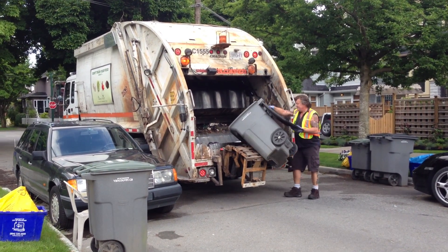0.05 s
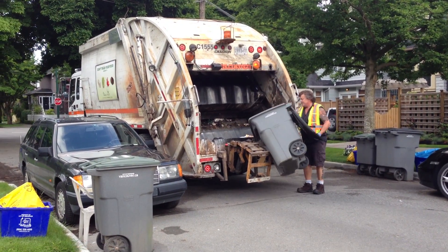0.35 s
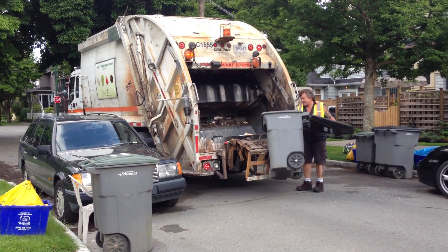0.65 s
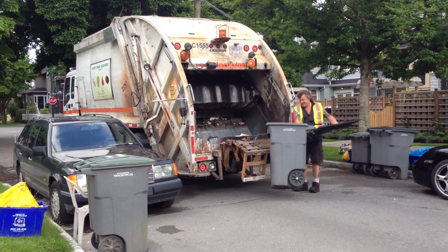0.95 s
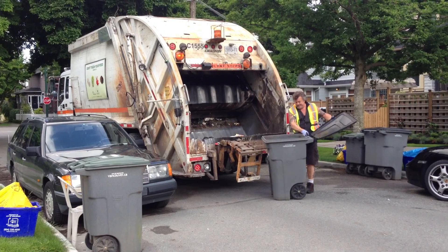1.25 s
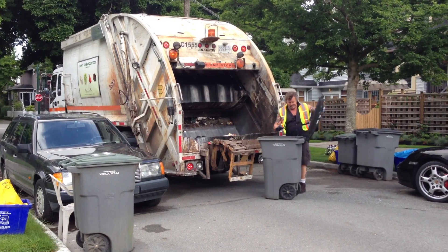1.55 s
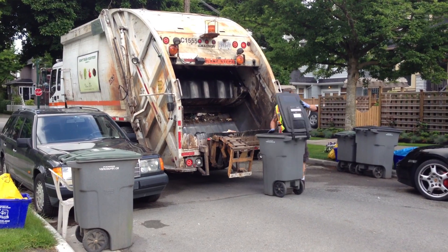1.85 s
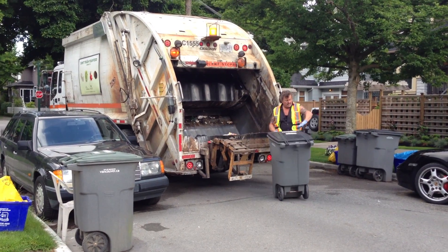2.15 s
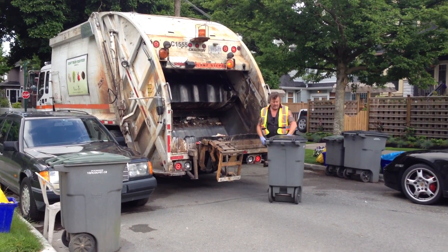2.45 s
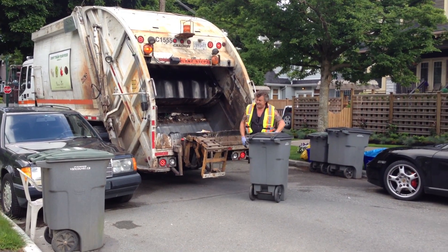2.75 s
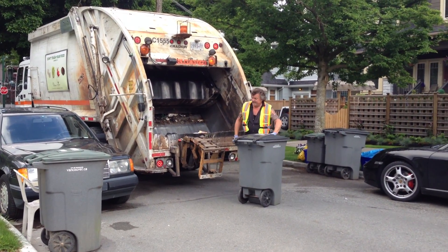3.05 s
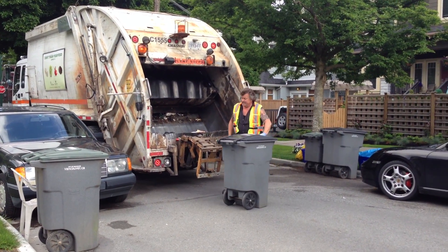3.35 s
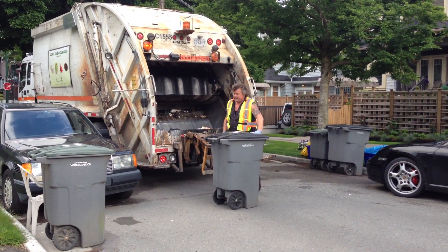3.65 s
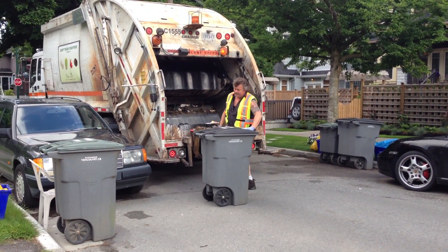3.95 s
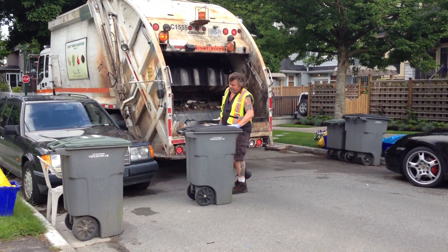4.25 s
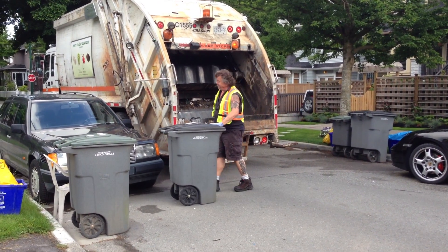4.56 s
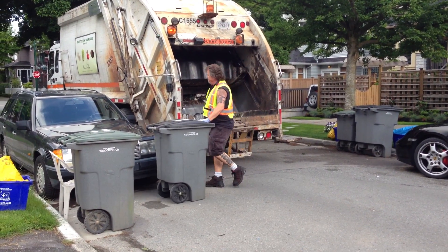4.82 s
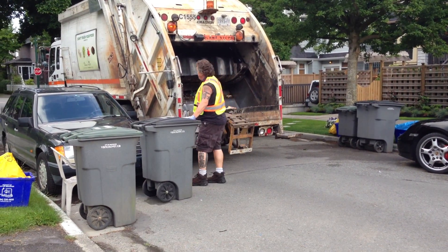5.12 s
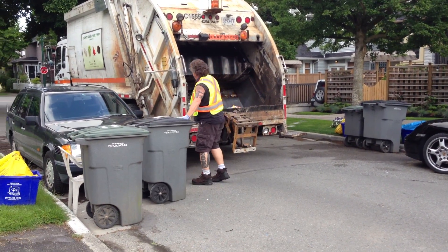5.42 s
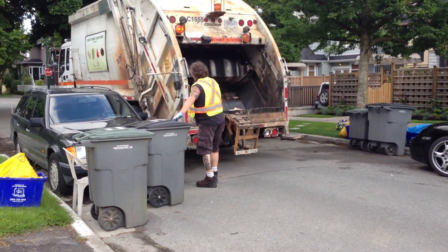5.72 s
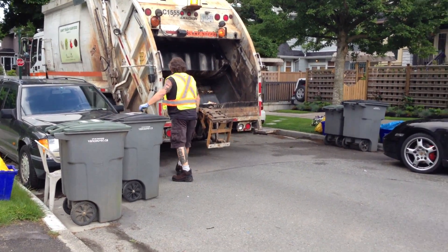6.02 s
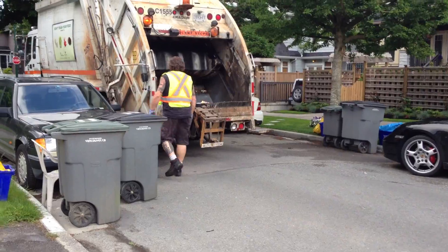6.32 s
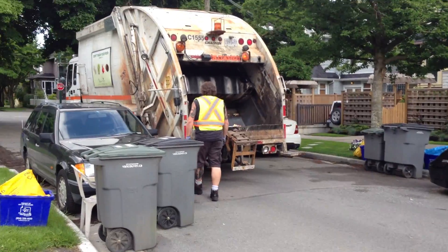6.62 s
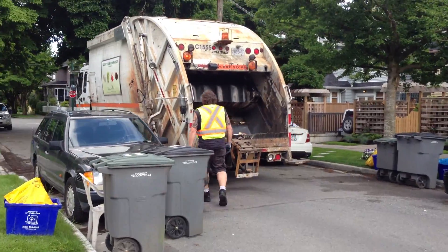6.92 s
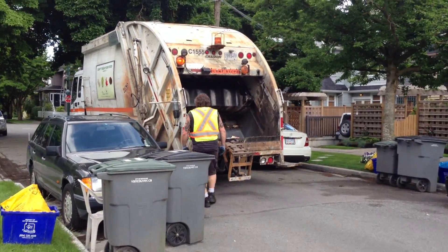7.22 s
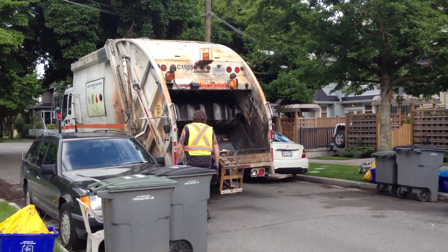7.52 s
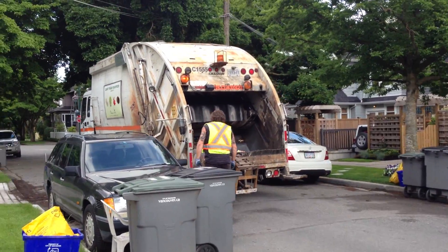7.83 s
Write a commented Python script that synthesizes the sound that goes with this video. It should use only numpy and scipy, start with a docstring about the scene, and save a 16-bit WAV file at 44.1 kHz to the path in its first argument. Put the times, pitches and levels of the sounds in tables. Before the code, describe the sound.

A garbage truck idles while a hollow plastic bin thumps down, its lid flops shut and its wheels rattle away.

```python
"""A street, a garbage truck idling. An emptied plastic wheeled bin bangs off its steel lifter and is dropped.
The lid flops shut, then the bin is pushed over rough asphalt: wheels rattle, stones snap, the base
scrapes, an axle squeaks. Every blow rings the same hollow body; truck and house fronts echo briefly."""
import sys
import numpy as np
from scipy import signal
from scipy.fft import rfft, irfft
from scipy.io import wavfile
from scipy.ndimage import uniform_filter1d

SR = 44100
rng = np.random.default_rng(int(sys.argv[2]) if len(sys.argv) > 2 else 0)


def wav_out(sig):
    """Save sig, one row per channel (or a flat mono array), as 16-bit PCM at SR to the path in sys.argv[1]."""
    wavfile.write(sys.argv[1], SR, np.round(np.clip(np.atleast_2d(sig).T, -1, 1) * 32767).astype(np.int16))


N = 347508
RING_SAMPLES = 32768

# Modes of the hollow bin. Each row: centre in Hz, width in Hz, strength in dB re the broad spectrum.
BIN_MODES = [(137, 30, 6.5), (228, 17, 4), (290, 25, 3.5), (377, 22, 1), (514, 9.2, 1.5), (577.4, 31, 7.5),
             (650, 70, 3.5), (743, 15, 8), (777, 83, 8), (867, 62, 8.5), (1196, 69, 4.5), (1334, 45, 3),
             (1807, 130, 2)]
# Bin and lid contacts. Each row: start in seconds, level in dB, boom, slap and crack shares in dB,
# base t60 in seconds, rise in seconds, panel pitch in Hz.
THUMPS = [(0.095, -27.5, -8, -3, -16, 0.15, 0.0046, 696), (0.222, -30, -9, -4, -19, 0.11, 0.0046, 727),
          (0.27, -37, -8, -4, -21, 0.4, 0.017, 703), (0.554, -11.5, -10, -10, -19, 0.064, 0.0042, 692),
          (1.163, -13, -2.5, 6, -6, 0.065, 0.0003, 524), (1.179, -16.5, -1.5, 6, -15, 0.13, 0.0018, 226),
          (1.19, -8.5, -6.5, 0.5, -14, 0.093, 0.0017, 765), (1.232, -15.5, -7, -3, -18, 0.11, .003, 742),
          (1.265, -24, 1, -3, -18, 0.12, .003, 810), (1.339, -7.5, -5.5, 1, -14, 0.1, 0.004, 232.5),
          (1.385, -17, -9, -2, -24, 0.12, 0.0019, 392), (1.414, -25.5, -7, -6, -10, 0.16, 0.0025, 140),
          (1.623, -20.5, -3.5, -6, -21, 0.087, 0.0086, 798), (1.823, -27, -1, -4, -17, 0.05, .002, 783),
          (1.85, -36, -3, -6, -17, 0.28, 0.0034, 636), (1.947, -24.5, -4, 2.5, -5.5, 0.11, 0.001, 220),
          (1.977, -31, -10, -4, -8, 0.2, .003, 838), (2.368, -24, -4, 3, -13, 0.098, 0.00077, 746),
          (2.436, -33, -1, -2, -10, 0.14, 0.0023, 800), (2.521, -23, 3.5, 7, -2, 0.081, 0.0052, 700),
          (2.537, -21, -0.5, 0.5, -9, 0.09, 0.0022, 241.5),
          (2.577, -25.5, -3, 5, -1.5, 0.081, 0.00093, 284), (2.617, -20.5, -4, -1, -9, 0.078, 0.00045, 684),
          (2.772, -35.5, -14, 1, 1, 0.17, .001, 554), (2.889, -23, -10, 1.5, -16, 0.11, 0.0011, 594),
          (3.092, -23.5, -12, -2.5, -13, 0.12, 0.0058, 623), (3.168, -22, -7, 2, -16, 0.092, 0.0017, 622),
          (3.25, -31.5, -4, -4, -15, 0.17, 0.0055, 786), (4.067, -31.5, -4, -6, -17, 0.23, .002, 790),
          (4.3, -28.5, 0.5, 2, -17, 0.21, 0.0057, 728), (4.748, -16.5, -10.5, 2.5, -12, 0.11, 0.0026, 1341),
          (5.378, -25, 0.5, -11, -13, 0.073, 0.0016, 705), (5.543, -28.5, -9, 4, -19, 0.086, 0.0018, 760)]


def undb(db):
    """Decibels to gain."""
    return 10 ** (np.asarray(db) / 20)


def curve(rows):
    """Rows of (seconds, value), interpolated per sample."""
    return np.interp(np.arange(N) / SR, *np.transpose(rows))


def decay(t, t60_s):
    """Exponential fall, 60 dB in t60_s."""
    return np.exp(-np.log(1000) * t / t60_s)


def unit_energy(x):
    """Scale to a sum of squares of 1."""
    return x / np.sqrt(np.sum(x ** 2))


def walk(rate_hz):
    """Random steps, smoothed twice; spread near 1."""
    hold = max(int(SR / rate_hz), 2)
    steps = np.repeat(rng.standard_normal(N // hold + 1), hold)
    return 1.33 * uniform_filter1d(uniform_filter1d(steps, hold), hold)[:N]


def response(shape, modes, band_hz=None):
    """Minimum-phase ring of unit energy: a broad spectrum with resonances, optionally one band of it."""
    f = np.maximum(np.fft.rfftfreq(RING_SAMPLES, 1 / SR), 1)
    shape_hz, shape_db = np.transpose(shape)
    power = undb(np.interp(np.log(f), np.log(shape_hz), shape_db)) ** 2
    power *= 1 + sum(undb(db) ** 2 / (1 + (2 * (f - hz) / width_hz) ** 2) for hz, width_hz, db in modes)
    if band_hz:
        power = power / (1 + (band_hz[0] / f) ** 8) / (1 + (f / band_hz[1]) ** 8)
    half = RING_SAMPLES // 2
    cepstrum = irfft(np.log(power + 1e-9 * power.max()) / 2)
    cepstrum[1:half] *= 2
    cepstrum[half + 1:] = 0
    return unit_energy(irfft(np.exp(rfft(cepstrum)))[:half])


def through(force, ring):
    """Convolve a force with a ring."""
    return signal.oaconvolve(force, ring)[:N]


def grains(spread_db, size=N, ripple_db=0, ripple_points=110):
    """Dense tiny contacts of uneven strength, rms 1; spectral ripple adds chance resonances."""
    x = rng.standard_normal(size)
    if ripple_db:
        position = np.linspace(0, ripple_points - 1, size // 2 + 1)
        ripple = np.interp(position, np.arange(ripple_points), rng.standard_normal(ripple_points))
        ripple *= np.minimum(np.fft.rfftfreq(size, 1 / SR) / 1500, 1)
        x = irfft(rfft(x) * undb(ripple_db * ripple), size)
    strength = np.repeat(rng.standard_normal(size // 16 + 1), 16)[:size]
    x = x * undb(spread_db * strength)
    return x / np.sqrt(np.mean(x ** 2))


def blows(rows, shape, modes, bands_hz, offsets_db, t60_scales, spread_db, ripple_db):
    """Dying bursts of chatter ring the bin by bands; a row has a share for each band after the first."""
    t = np.arange(RING_SAMPLES // 2) / SR
    forces = np.zeros((len(bands_hz), N + len(t)))
    for start_s, db, *shares_db, t60_s, rise_s in rows:
        start = int(start_s * SR)
        chatter = grains(spread_db, len(t), ripple_db, ripple_points=220) * (1 - np.exp(-t / rise_s))
        for force, share_db, scale in zip(forces, (0, *shares_db), t60_scales):
            force[start:start + len(t)] += undb(db + share_db) * decay(t, t60_s * scale) * chatter
    return sum(undb(db) * through(force[:N], response(shape, modes, band_hz))
               for force, db, band_hz in zip(forces, offsets_db, bands_hz))


def truck(crank_hz=12.15, throb_db=0.5, firing_db=1.0, flutter_db=2.3, clatter_db=-42.5, fade_db_s=0.2163):
    """A six-cylinder diesel idles: clatter, casing resonances throbbing with the crank, pump tones."""
    # Clatter spectrum. Each row: frequency in Hz, level in dB.
    shape = [(30, -35), (60, -21), (100, -2), (200, 3), (330, 2), (500, 0), (780, 3), (1100, 1), (1700, 1),
             (3200, -1), (4400, -1), (5800, -6), (8500, -6), (10200, -6), (12000, -9.5), (15000, -18)]
    # Casing resonances. Each row: centre in Hz, width in Hz, level in dB, throb depth in dB.
    casing_modes = [(736, 170, 1, 0.5), (1300, 240, -2, -2), (2005, 360, -0.5, -1), (2494, 300, 3.5, 1),
                    (4510, 910, -1.5, 1), (7320, 1250, 4, 2.5)]
    # Engine and hydraulic pump tones. Each row: frequency in Hz, level in dB.
    partials = [(96.6, -73.5), (123.4, -67.5), (158, -68), (188.6, -64.5), (289.5, -65), (386.3, -69.5),
                (483, -69), (581.5, -66), (1350, -68), (1448, -85), (1827, -67.5)]
    engine_s = np.cumsum(1 + 0.00209 * walk(3)) / SR
    angle = 2 * np.pi * crank_hz * engine_s
    crank, firing = np.cos(angle), np.cos(3 * angle)
    ring = response(shape, [])
    # Fine ripple: combing by reflections off the truck body.
    clatter = through(grains(spread_db=1.5, ripple_db=2.5, ripple_points=1200), ring)
    shaking = through(grains(spread_db=1.5, ripple_db=2.5, ripple_points=1200), ring)
    for hz, width_hz, db, depth_db in casing_modes:
        casing = signal.butter(2, (hz - width_hz / 2, hz + width_hz / 2), "bandpass", fs=SR, output="sos")
        clatter += undb(db + depth_db * crank + flutter_db * walk(16)) * signal.sosfilt(casing, shaking)
    clatter *= undb(throb_db * crank + firing_db * firing)
    tones = sum(np.sqrt(2) * undb(db + 2.9 * walk(12)) * np.sin(2 * np.pi * hz * engine_s)
                for hz, db in partials)
    return undb(clatter_db - fade_db_s * engine_s) * clatter / clatter.std() + tones


def street_echo(x, echo_db=-13, t60_s=0.5, lowpass_hz=5000, build_s=0.023):
    """Add scattered echoes from the truck, parked cars and house fronts."""
    t = np.arange(RING_SAMPLES) / SR
    tail = grains(spread_db=5.0, size=len(t)) * decay(t, t60_s) * np.minimum(t / build_s, 1) ** 2
    lowpass = signal.butter(1, lowpass_hz, fs=SR, output="sos")
    return x + undb(echo_db) * through(x, signal.sosfilt(lowpass, unit_energy(tail)))


def squeak(pitch_hz=4257):
    """A dry axle sings one thin note that swells twice and fades."""
    # Squeak envelope. Each row: time in seconds, level in dB.
    levels = [(5.52, -90), (5.585, -55), (5.69, -42.5), (5.76, -35.5), (5.82, -44), (5.86, -42.5),
              (5.945, -52), (6.05, -90)]
    hz = pitch_hz * (1 + 0.0013 * walk(90))
    return np.sqrt(2) * undb(curve(levels) + 0.8 * walk(37)) * np.sin(2 * np.pi * np.cumsum(hz) / SR)


def rolling(start_s=2.7, fastest_s=4.64, stop_s=5.89, rise_db_s=4.5, fall_db_s=7.5,
            rumble_db=-39, grit_db=-42.5, grit_growth=1.83, walking_db=-36.5):
    """Asphalt bumps drum the body, louder with speed; the wheels grind grit as they bear down."""
    # How hard the wheels run. Each row: time in seconds, level in dB.
    push = [(2.75, -37), (3.12, -37.5), (3.24, -34.5), (3.59, -38.5), (4.02, -40), (4.17, -35.5),
            (4.59, -35), (4.73, -28.5), (4.89, -32.5), (5.09, -36), (5.37, -33.5), (5.7, -35.5),
            (5.9, -37.5), (6.0, -44)]
    # Rolling spectrum. Each row: frequency in Hz, level in dB.
    shape = [(60, -16.5), (130, -6.5), (250, 3.5), (430, -3.5), (700, 1), (1020, -6.5), (1600, -3.5),
             (4200, -4), (6500, -8.5), (10000, -9), (15000, -22.5)]
    t = np.arange(N) / SR
    push_db = curve(push) - walking_db
    speed_db = np.minimum(rise_db_s * (t - fastest_s), fall_db_s * (fastest_s - t))
    moving = uniform_filter1d(1. * ((t > start_s) & (t < stop_s)), size=4000)
    bumps = walk(55)
    rumble = undb(rumble_db + speed_db + 2.5 * bumps) * grains(spread_db=3.5)
    grit = undb(grit_db + grit_growth * push_db + 1.4 * bumps) * grains(spread_db=4.0)
    return (through(moving * rumble, response(shape, BIN_MODES, (60, 1300)))
            + through(moving * grit, response(shape, BIN_MODES, (1300, 18000))))


def scrapes(hiss_db=-2, grind_db=-3, split_hz=6500, attack_s=0.012, release_s=0.041):
    """Plastic drags on steel and asphalt: the contact hisses, the shell grinds."""
    # Drags. Each row: start in seconds, level in dB, shell share in dB, length in seconds.
    drags = [(0.582, -37, 11, 0.049), (3.061, -38, 4.5, 0.089), (3.19, -44, 1, .19),
             (4.55, -20.5, -1, 0.02), (5.202, -21, -3, 0.06), (5.26, -39.5, 11, 0.048),
             (5.329, -20.5, -3.5, 0.043)]
    # Scrape spectrum. Each row: frequency in Hz, level in dB.
    shape = [(80, -31), (260, -2), (430, -6.5), (650, -0.5), (1020, -12), (1500, -0.5), (3000, 0.5),
             (4500, -3.5), (7000, -3), (8500, 0), (10000, 2), (11800, -4), (13000, -17), (15000, -32)]
    t, hiss, grind = np.arange(N) / SR, np.zeros(N), np.zeros(N)
    for start_s, db, shell_db, length_s in drags:
        attack = (t - start_s) / attack_s
        release = (start_s + length_s - t) / release_s + .5
        pressure = undb(db) * np.clip(np.minimum(attack, release), 0, 1)
        hiss += pressure
        grind += undb(shell_db) * pressure
    slips = undb(walk(220)) * grains(spread_db=4.0, ripple_db=1.5, ripple_points=500)
    return (undb(hiss_db) * through(hiss * slips, response(shape, BIN_MODES, (split_hz, SR / 2)))
            + undb(grind_db) * through(grind * slips, response(shape, BIN_MODES, (20, split_hz))))


def stones(snap_t60_s=0.013, rattle_db=-11, rattle_t60_s=0.12, rise_s=0.0002):
    """Stones snap under a wheel: a sharp tick, then a short rattle in the bin."""
    # Snaps. Each row: start in seconds, level in dB, body share in dB.
    snaps = [(2.873, -22.5, -2), (3.301, -23, -12), (3.369, -29, -23), (3.407, -28, -16), (3.485, -29, -16),
             (3.632, -24, -7), (3.988, -24, -2), (4.067, -20, -8), (4.207, -32, -16), (4.977, -25, -17),
             (5.176, -25.5, -17), (5.463, -22.5, -1.5), (5.505, -27, -14), (5.647, -22, -6.5),
             (5.728, -20, -3), (5.979, -33.5, -10)]
    # Snap spectrum. Each row: frequency in Hz, level in dB.
    shape = [(100, -4), (700, 2.5), (1050, -5), (1500, 1), (4500, 6), (7000, 4.5), (11000, 0.5),
             (15000, -19)]
    rows = []
    for start_s, db, body_db in snaps:
        rows.append((start_s, db, body_db, snap_t60_s, rise_s))
        rows.append((start_s, db + rattle_db, body_db, rattle_t60_s, rise_s))
    return blows(rows, shape, BIN_MODES, bands_hz=[(2380, 21000), (100, 2100)],
                 offsets_db=(.5, -.5), t60_scales=(1.05, 1.5), spread_db=5.5, ripple_db=4.0)


def jolts(big_db=-12.5, scuff_lead_s=0.016, scuff_db=-7.5, scuff_t60_s=0.1, scuff_rise_s=0.017):
    """Wheels knock on the loose axle: the shell drums and clacks, grit fizzes; big jolts scuff first."""
    # Knocks. Each row: start in seconds, level in dB, drum, clack and fizz shares in dB,
    # base t60 in seconds.
    knocks = [(2.889, -21, -4, -0.5, -5, 0.07), (3.105, -12, -16.5, -9.5, -0.5, .065),
              (3.144, -17.5, -12, -8, 1.5, 0.062), (3.167, -14.5, -3, -10, -2, 0.053),
              (3.243, -11.5, -16.5, -11, -0.5, 0.071), (3.315, -26.5, 1, -8, 6, 0.055),
              (3.353, -26, -2, -4.5, 6, 0.059), (4.224, -17, -5, -2, 0.5, 0.038),
              (4.297, -13, -13, -19, 4.5, 0.043), (4.319, -11, -8.5, -9.5, 4.5, .1),
              (4.563, -10, -9, -16, 1.5, 0.17), (4.608, -13, -5, -6.5, -9, 0.079),
              (4.641, -9.5, -13, -12, -0.5, 0.27), (4.679, -18, -4, -2, -4, 0.12),
              (4.707, -14, -8, -4.5, -14, 0.14), (4.746, -4, -9, -5, -2, 0.12),
              (5.057, -18, -10, -8.5, -1.5, 0.13), (5.121, -25.5, -17, -20, 1.5, 0.11),
              (5.266, -18.5, -0.5, 1, -7, 0.11), (5.378, -3.5, -12.5, -9, -0.5, 0.056),
              (5.396, -17.5, -9, -14, 2, 0.089), (5.542, -21, -5, -8, 4, 0.095),
              (5.774, -24, -11, -13, 5, 0.11), (5.838, -25, -16, -12.5, 1, 0.091),
              (5.857, -30, -13, -18, -3, 0.11)]
    # Knock spectrum. Each row: frequency in Hz, level in dB.
    shape = [(60, -4), (130, -3.5), (260, 10), (430, 1), (620, 12), (850, 5), (1020, 0.5), (1400, 9),
             (2200, 10.5), (3800, 7), (6500, 3.5), (8800, 1.5), (12500, -10), (15000, -25)]
    # Hard plastic wheel modes. Each row: centre in Hz, width in Hz, strength in dB.
    wheel_modes = [(3260, 44, -4.5), (3870, 97, 2), (4480, 220, 3.5), (5200, 260, 4)]
    rows = []
    for start_s, db, *shares_db, t60_s in knocks:
        rise_s = 0.0007 + 0.002 * undb(db)
        rows.append((start_s, db, *shares_db, t60_s, rise_s))
        if db > big_db:
            rows.append((start_s - scuff_lead_s, db + scuff_db, *shares_db, scuff_t60_s, scuff_rise_s))
    bands_hz = [(2680, 6100), (125, 1090), (920, 2680), (7640, 33000)]
    return blows(rows, shape, BIN_MODES + wheel_modes, bands_hz, offsets_db=(-3.5, -5, 0, -7),
                 t60_scales=(1.18, 1.37, 1.24, 0.84), spread_db=3.0, ripple_db=3.5)


def cavity(x, send_db=-11.5, band_hz=(630, 880), t60_s=0.6):
    """Add the air in the empty bin, ringing on after a blow."""
    t = np.arange(RING_SAMPLES) / SR
    tail = unit_energy(rng.standard_normal(len(t)) * decay(t, t60_s))
    bandpass = signal.butter(2, band_hz, "bandpass", fs=SR, output="sos")
    return x + undb(send_db) * signal.sosfilt(bandpass, through(x, tail))


def panels(panel_db=-5, t60_scale=1.25, overtone_ratio=1.62, overtone_db=-6, flex=0.025, flex_s=0.014):
    """Each thump rings the struck panel; the plastic is stiffer while bent, so the note sags."""
    t = np.arange(RING_SAMPLES // 2) / SR
    out = np.zeros(N + len(t))
    warped_s = np.cumsum(1 + flex * np.exp(-t / flex_s)) / SR
    for start_s, db, *_, t60_s, rise_s, hz in THUMPS:
        angle, fade = 2 * np.pi * hz * warped_s, decay(t, t60_scale * t60_s)
        note = np.sin(angle) * fade + undb(overtone_db) * np.sin(overtone_ratio * angle) * fade ** 2
        start = int(start_s * SR)
        out[start:start + len(t)] += np.sqrt(2) * undb(db + panel_db) * (1 - np.exp(-t / rise_s)) * note
    return out[:N]


def thumps():
    """The bin lands and rocks, the lid falls: each contact mixes hollow boom, slap and crack."""
    # Thump spectrum. Each row: frequency in Hz, level in dB.
    shape = [(60, -16.5), (125, -4.5), (270, 4), (400, -0.5), (750, -2), (1050, 0.5), (1900, -7),
             (2800, -17), (5000, -24), (9000, -33.5), (15000, -46)]
    bands_hz = [(435, 900), (88.5, 403), (1050, 2260), (2520, 21000)]
    return blows([row[:-1] for row in THUMPS], shape, BIN_MODES, bands_hz,
                 offsets_db=(-1.5, -1.5, -6.5, -4.5), t60_scales=(1.72, 1.62, 1.36, 1.35),
                 spread_db=0.5, ripple_db=3.0)


def bangs(boom_db=-3, t60_s=0.17, rise_s=0.00048, gap_s=0.0215, rebound_db=-6.5, loss_db=2):
    """The bin clacks against the steel lifter and judders off in even, fading rebounds."""
    # Strikes. Each row: start in seconds, level in dB, crack share in dB, judder length in seconds.
    strikes = [(0.004, -11.5, -12, 0), (0.531, -10, -7.5, .075)]
    # Strike spectrum. Each row: frequency in Hz, level in dB.
    shape = [(60, -18), (120, -4.5), (250, -2.5), (420, -5.5), (700, -4.5), (900, -1.5), (1200, 4),
             (1550, 0.5), (2300, -6), (3200, -11), (6000, -16.5), (10000, -26.5), (15000, -41)]
    # Steel lifter modes. Each row: centre in Hz, width in Hz, strength in dB.
    lifter_modes = [(1520, 77, 4), (3050, 260, -1)]
    judder = (3, 1, 0.16, 0.0038)  # boom dB, crack dB, base t60 s, rise s
    rows = []
    for start_s, db, crack_db, judder_s in strikes:
        rows.append((start_s, db, boom_db, crack_db, t60_s, rise_s))
        for k in range(int(judder_s / gap_s)):
            rows.append((start_s + (k + 1) * gap_s, db + rebound_db - k * loss_db, *judder))
    bands_hz = [(1100, 1530), (70, 1130), (2500, 16000)]
    return blows(rows, shape, BIN_MODES + lifter_modes, bands_hz, offsets_db=(-1.5, -1.5, -1.5),
                 t60_scales=(.95, 1.1, .9), spread_db=1.5, ripple_db=3.0)


def scene():
    """The bin in the street, the truck idling behind it."""
    impacts = cavity(bangs() + thumps()) + panels()
    travel = jolts() + stones() + scrapes() + rolling() + squeak()
    return (street_echo(impacts + travel) + truck())[None]


def record(dry, highpass_hz=65, ceiling=0.85, lowpass_hz=15400):
    """Thin the bass, soften the loudest peaks and cut the highest treble."""
    thin = signal.sosfilt(signal.butter(2, highpass_hz, "highpass", fs=SR, output="sos"), dry)
    softened = ceiling * np.tanh(thin / ceiling)
    return signal.sosfilt(signal.ellip(8, .2, 80, lowpass_hz, fs=SR, output="sos"), softened)


dry = scene()
out = record(dry)
wav_out(out)
```